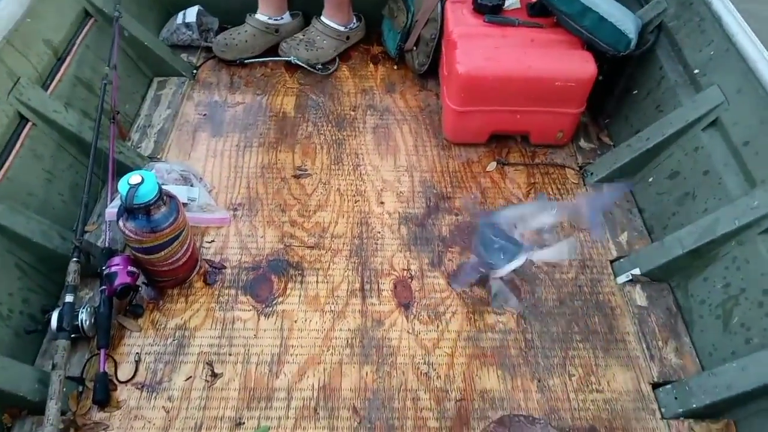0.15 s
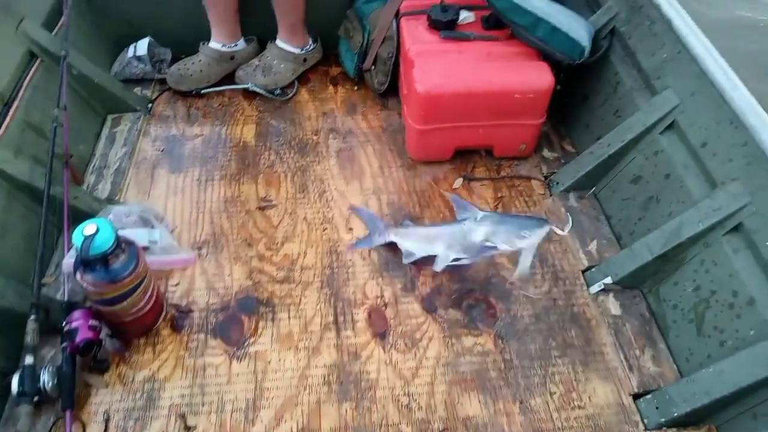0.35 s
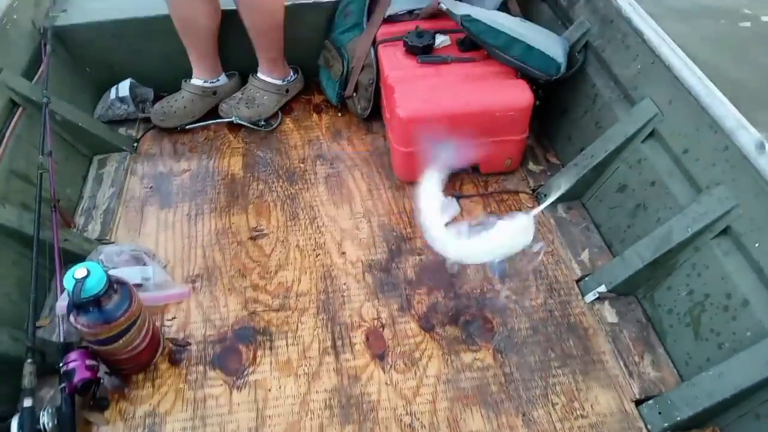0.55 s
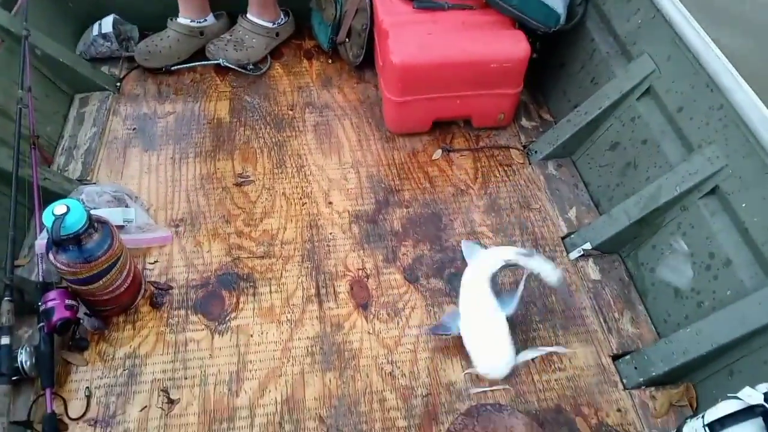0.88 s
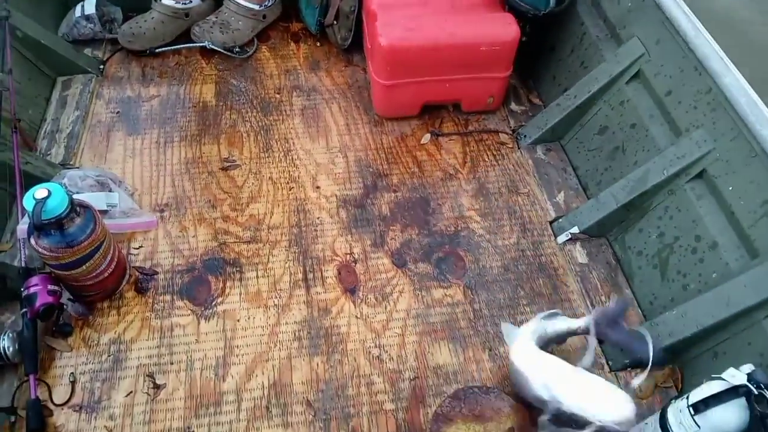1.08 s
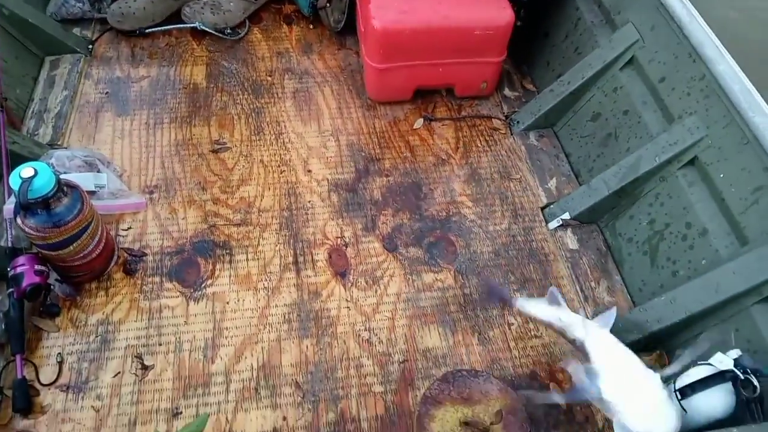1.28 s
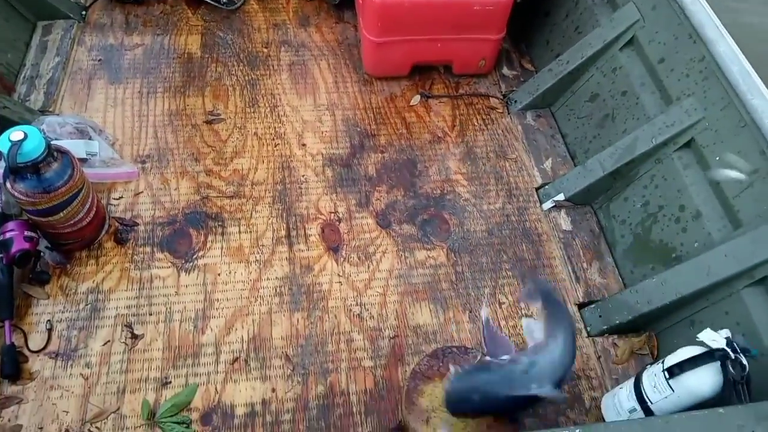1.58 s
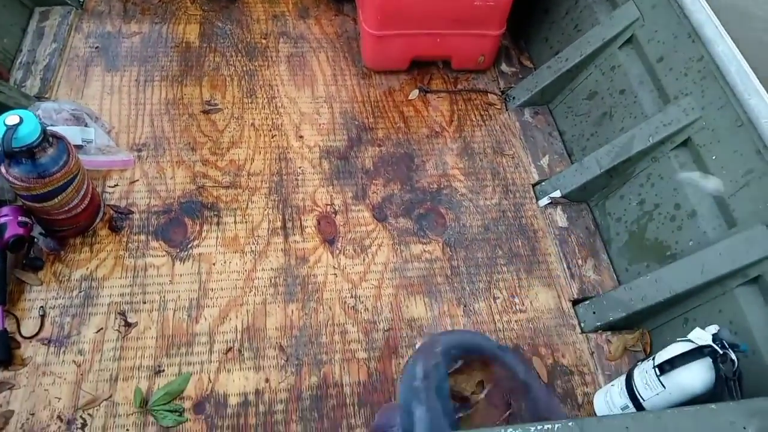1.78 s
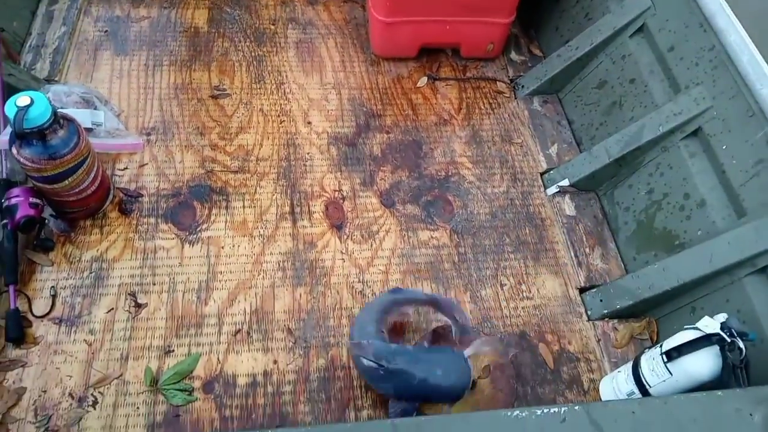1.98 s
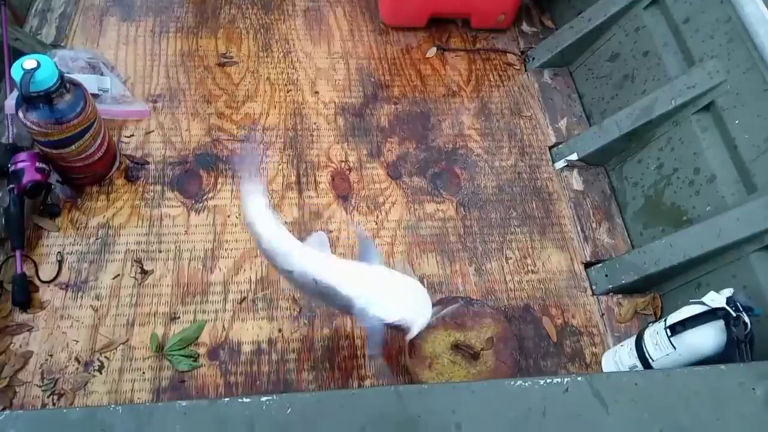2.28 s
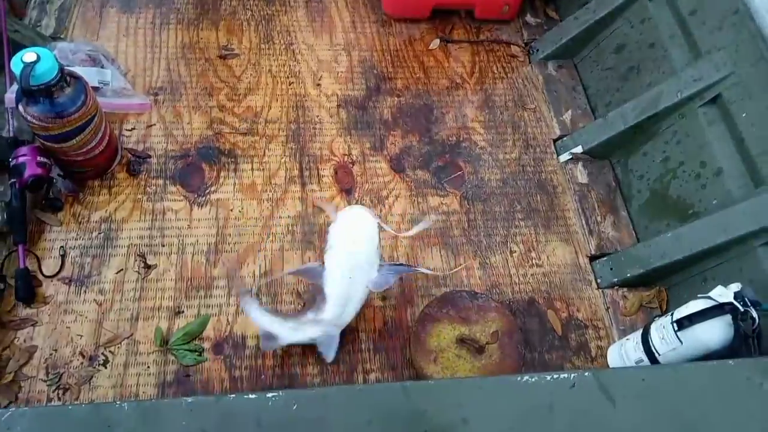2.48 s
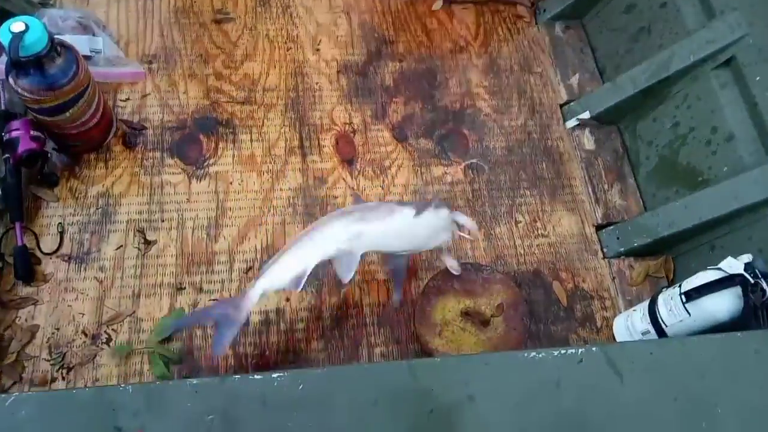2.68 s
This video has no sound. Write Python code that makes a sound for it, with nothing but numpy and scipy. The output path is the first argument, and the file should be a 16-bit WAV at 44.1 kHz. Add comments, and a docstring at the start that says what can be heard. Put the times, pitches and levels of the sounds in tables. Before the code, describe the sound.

A wet fish flops on a small metal boat's wooden floor, close and nearly mono. Faint slithers lead to the loudest slap and boom at 0.24 s. Blows resume around 0.7-0.9 s, then a busy flurry from 1.0 to 1.5 s with scraping, squeaks and a sharp click at 1.35. Wet slithers and clicks follow near 1.7, a thump at 2.0, a hard slap at 2.45, then weak pats over quiet open air.

```python
"""Wet fish in a metal boat

A wet fish thrashes on the plywood floor of a small metal boat, heard close up and nearly mono.
Its body thumps the boards and sets the hull ringing: fading sine tones plus shaped noise.
Its tail slaps and its skin slithers: bursts of noise and tiny crackles, unevenly coloured.
Fins scrape, click and squeak as gliding tones and short noises, over quiet open air."""
import sys
import numpy as np
from scipy import signal
from scipy.fft import rfft, irfft, next_fast_len
from scipy.io import wavfile
from scipy.ndimage import map_coordinates

SR = 44100
rng = np.random.default_rng(int(sys.argv[2]) if len(sys.argv) > 2 else 0)


def materialize(psi):
    """Save the field psi as 16-bit PCM at rate SR to the path in sys.argv[1].

    A 1-D psi becomes a single channel; in a 2-D psi each row is a channel.
    """
    bounded = np.clip(np.atleast_2d(psi).T, -1, 1)
    quanta = np.round(bounded * 32767).astype(np.int16)
    wavfile.write(sys.argv[1], SR, quanta)


N = 125685  # length of the scene in samples


def amp(db):
    """Turn decibels into a gain."""
    return 10 ** (np.asarray(db) / 20)


def decay(t, t60):
    """A natural fade that drops 60 dB in t60 seconds."""
    return amp(-60 * t / t60)


def rise(t, s):
    """A soft attack: most of the way up after s seconds."""
    return 1 - np.exp(-t / s)


def unit(x):
    """Scale to an average (rms) level of 1."""
    return x / np.sqrt(np.mean(x ** 2) + 1e-20)


def with_energy_of(envelope, x):
    """Scale x to the same average energy as the envelope."""
    return unit(x) * np.sqrt(np.mean(envelope ** 2))


def wobble(rate, size):
    """A smooth random curve with `rate` random points a second."""
    points = rng.standard_normal(int(size * rate / SR) + 4)
    return map_coordinates(points, [np.arange(size) * rate / SR])


def along(points, hz):
    """Gain at each frequency, read between (Hz, dB) points on a log axis."""
    f, db = np.transpose(points)
    return amp(np.interp(np.log(hz + 1), np.log(f + 1), db))


def filtered(x, response):
    """Colour x by a gain for each frequency."""
    m = next_fast_len(x.shape[-1] + 4096)
    spectrum = rfft(x, m) * response(np.fft.rfftfreq(m, 1 / SR))
    return irfft(spectrum, m)[..., :x.shape[-1]]


def resonance(f, hz, width_hz):
    """One resonance: strongest at hz, weaker on both sides."""
    return 1j * f * width_hz / (hz * hz - f * f + 1j * f * width_hz)


def burst(envelope, response):
    """Coloured noise that follows an envelope and has its energy."""
    noise = filtered(rng.standard_normal(len(envelope)), response)
    return with_energy_of(envelope, noise * envelope)


def add(track, s, x):
    """Mix x into the track from second s."""
    i = max(round(s * SR), 0)
    track[i:i + len(x)] += x[:max(len(track) - i, 0)]


PATCH_DB, PATCH_SPACING_HZ = 5.5, 149.6  # unevenness, and spacing of its random points


def patchy(f):
    """Uneven colour: a new random curve over frequency makes each noise burst patchy."""
    points = rng.standard_normal(400)
    curve = map_coordinates(points, [f / PATCH_SPACING_HZ], mode="mirror")
    return amp(PATCH_DB * np.clip(curve, -2, 2))


# Clear notes of the metal hull. Each row: pitch in Hz, relative level in dB.
HULL_NOTES = [(463, 14.5), (506, 11), (571, 12), (641, 6.5), (842, 7), (1026, 6), (1102, -4), (1416, 6.5),
              (1521, 5), (1689, 2), (1997, -3.5), (2050, -5.5)]
HULL_WIDTH_HZ = 8.6


def singing(f):
    """The hull's clear resonances alone: narrow peaks where the metal vibrates easily."""
    return sum(amp(db) * np.abs(resonance(f, hz, HULL_WIDTH_HZ)) ** 2 for hz, db in HULL_NOTES)


# Dense, blurred resonances of the hull. Each row: frequency in Hz, gain in dB.
HULL_BED = [(150, -54), (330, 10.5), (480, 4.5), (800, 3), (1300, -1.5), (2400, -9.5), (4500, -16.5),
            (6300, -25), (8000, -71), (16000, -52)]
HULL_PEAK_DB = -1  # clear notes against the bed


def hull(f):
    """The whole metal hull: clear notes over a bed of dense ones."""
    return along(HULL_BED, f) + amp(HULL_PEAK_DB) * singing(f)


# Tone of the open air. Each row: frequency in Hz, gain in dB.
AIR_SPECTRUM = [(15, -68), (25, -11), (82, 5), (185, -2.5), (217, -4.5), (363, -16), (575, -14.5),
                (754, -22), (2280, -24), (3520, -29.5), (5730, -21.5), (8140, -43.5), (16000, -41)]
AIR_DB = -55.5


def air():
    """Quiet open air: steady noise whose level drifts gently."""
    drift = amp(2.5 * wobble(7.8, size=N))
    return amp(AIR_DB) * burst(drift, lambda f: along(AIR_SPECTRUM, f))


# Short wide noise bursts at some of the blows. Each row: start in seconds, level in dB.
WIDE_BURSTS = [(0.234, -30), (0.706, -31), (1.152, -36), (1.353, -35.5)]
# Tone of the wide bursts. Each row: frequency in Hz, gain in dB.
WIDE_SPECTRUM = [(3800, -52), (5400, 11), (6500, -12), (8000, -10.5), (11300, -21), (13000, -25),
                 (16000, -32)]
WIDE_FADE_S = 0.011
BURST_RISE_S = 0.0008  # attack of wide bursts and slaps


def wide_bursts():
    """Short wide noise bursts, bright and opposite in sign left and right, at some of the blows."""
    out, t = np.zeros(N), np.arange(SR // 20) / SR
    for s, db in WIDE_BURSTS:
        envelope = rise(t, BURST_RISE_S) * np.exp(-t / WIDE_FADE_S)
        add(out, s, amp(db) * burst(envelope, lambda f: along(WIDE_SPECTRUM, f)))
    return out


# The boards flex as the fish winds up.
# Each row: time of the peak in seconds, pitch at the peak in Hz, level in dB, rise time in seconds.
FLEXES = [(0.234, 105, -34, .016), (0.63, 125, -43, .03), (0.692, 103, -23, .015), (0.747, 215, -30, .028),
          (1.095, 85, -33, .025)]
FLEX_RELEASE_S, FLEX_CLIMB_HZ_PER_S = 0.0052, 520


def flexes():
    """A low swell of the boards climbs in pitch under the load and ends as the fish lets go."""
    out = np.zeros(N)
    for s, hz, db, swell_s in FLEXES:
        t = np.arange(N) / SR - s  # negative before the peak
        phase = 2 * np.pi * (hz + FLEX_CLIMB_HZ_PER_S * t / 2) * t
        envelope = np.exp(np.minimum(t / swell_s, -t / FLEX_RELEASE_S))
        out += np.sqrt(2) * amp(db) * np.sin(phase) * envelope
    return out


# Path of the fin scrape. Each row: time in seconds, centre pitch in Hz, level in dB.
SCRAPE = [(1.225, 1239, -51), (1.243, 1149, -33), (1.261, 887, -36), (1.275, 626, -27), (1.293, 470, -32.5),
          (1.325, 440, -33)]
SCRAPE_WIDTH_HZ = 150


def fin_scrape():
    """A spine drags along the hull: a narrow band of noise slides down as a falling rasp."""
    t = np.arange(N) / SR
    s, hz, db = np.transpose(SCRAPE)
    phase = 2 * np.pi * np.cumsum(np.interp(t, s, hz)) / SR
    rasp = wobble(SCRAPE_WIDTH_HZ * 2, size=N) * np.sin(phase)
    rasp = rasp + wobble(SCRAPE_WIDTH_HZ * 2, size=N) * np.cos(phase)
    return rasp * amp(np.interp(t, s, db)) * (t > s[0]) * (t < s[-1])


# Rubbery squeaks of skin and fins.
# Each row: start in seconds, length in seconds, start pitch in Hz, end pitch in Hz, level in dB.
SQUEAKS = [(0.021, 0.018, 1020, 970, -41.5), (0.03, 0.041, 1100, 1120, -46),
           (0.104, 0.042, 3230, 3360, -50), (0.121, 0.051, 2120, 2200, -52.5),
           (1.014, 0.016, 4523, 4400, -41.5), (1.11, 0.0085, 1100, 750, -25.5),
           (1.279, 0.025, 4430, 4540, -27), (1.49, 0.098, 500, 502, -44), (1.66, 0.15, 520, 467, -53.5),
           (1.675, 0.077, 808, 864, -50), (1.812, 0.057, 345, 362, -41.5), (1.856, 0.089, 387, 406, -41),
           (1.869, 0.022, 503, 538, -36), (1.929, 0.079, 427.5, 444, -49)]
SQUEAK_ROUGH_RAD, SQUEAK_WAVER_HZ = 0.57, 219  # phase shake and how fast it changes


def squeaks():
    """Skin catches and slips fast enough to give a short, unsteady pitch."""
    out, t = np.zeros(N), np.arange(SR // 5) / SR
    for s, length, start_hz, end_hz, db in SQUEAKS:
        progress = np.minimum(t / length, 1)
        glide_hz = start_hz + (end_hz - start_hz) * progress
        shake = SQUEAK_ROUGH_RAD * wobble(SQUEAK_WAVER_HZ, size=len(t))
        tone = np.sin(2 * np.pi * np.cumsum(glide_hz) / SR + shake)
        level = amp(db + 2.3 * wobble(SQUEAK_WAVER_HZ, size=len(t)))
        add(out, s, np.sqrt(2) * level * np.sin(np.pi * progress) * tone)
    return out


# Hard fin spines click on the floor and the hull.
# Each row: start in seconds, level in dB, ring pitch in Hz.
TICKS = [(0.171, -45.5, 4940), (1.252, -20.5, 4700), (1.3536, -13.5, 4260), (1.657, -29, 5100),
         (1.686, -23, 4050)]
# Bright tone of clicks and, further down, splashes. Each row: frequency in Hz, gain in dB.
SPLASH_SPECTRUM = [(500, -63), (1500, -34), (2800, -4.5), (4200, 2.5), (6100, -3.5), (7000, -6.5),
                   (8200, -15), (10300, -14.5), (13000, -26), (15500, -19.5)]
TICK_T60_S, TICK_WIDTH_HZ, TICK_RING_DB = 0.014, 1600, 25.5
TICK_TAIL_DB, BRIGHT_TAIL_T60_S = -19.5, 0.14  # the slaps share this tail time


def ticks():
    """A spine's hard tip gives a very short ringing click and a faint echo that fades smoothly."""
    out, t = np.zeros(N), np.arange(SR // 8) / SR
    for s, db, hz in TICKS:
        def colour(f):
            ring = amp(TICK_RING_DB) * resonance(f, hz, TICK_WIDTH_HZ)
            return along(SPLASH_SPECTRUM, f) * (1 + ring)

        click = burst(decay(t, TICK_T60_S), colour)
        echo = burst(amp(TICK_TAIL_DB) * decay(t, BRIGHT_TAIL_T60_S), colour)
        add(out, s, amp(db) * (click + echo))
    return out


CRACKLES_PER_S, CRACKLE_T60_S, CRACKLE_SPREAD_DB = 6000, 0.014, 10
CRACKLE_LOW_HZ, CRACKLE_HIGH_HZ = 700, 15500


def crackle(envelope, response):
    """Tiny bubbles of slime burst: each one is a short ping at a random time, pitch and strength."""
    size, t = len(envelope), np.arange(SR // 50) / SR
    draws = rng.random((int(CRACKLES_PER_S * size / SR), 3))
    when, pitch, weakness = draws.T[:, :, None]
    hz = CRACKLE_LOW_HZ * (CRACKLE_HIGH_HZ / CRACKLE_LOW_HZ) ** pitch
    strength = np.sqrt(hz) * amp(-CRACKLE_SPREAD_DB * weakness)
    pings = strength * decay(t, CRACKLE_T60_S) * np.sin(2 * np.pi * hz * t)
    at = ((when * size).astype(int) + np.arange(len(t))) % size
    summed = np.bincount(at.ravel(), pings.ravel(), size)
    return with_energy_of(envelope, filtered(summed, response) * envelope)


# Wet skin sliding on the boards.
# Each row: start in seconds, length in seconds, hiss level in dB, rub level in dB.
SLIDES = [(0.0, 0.058, -38.5, -57), (0.541, 0.026, -57.5, -80), (0.602, 0.024, -52, -68),
          (0.645, 0.023, -51, -81), (0.695, 0.064, -40, -36.5), (0.79, 0.2, -56.5, -46),
          (0.996, 0.21, -44.5, -42.5), (1.224, 0.1, -38, -31), (1.244, 0.032, -32, -30),
          (1.332, 0.17, -44, -34), (1.47, 0.1, -62, -39.5), (1.575, 0.094, -63.5, -53),
          (1.645, 0.085, -37, -47), (1.742, 0.089, -59.5, -47.5), (1.818, 0.094, -65, -52.5),
          (1.864, 0.065, -46.5, -46), (1.939, 0.22, -49.5, -50.5), (2.03, .11, -47.5, -39.5),
          (2.56, 0.14, -50.5, -45.5), (2.742, 0.34, -48.5, -74)]
# Tone of the wet hiss. Each row: frequency in Hz, gain in dB.
HISS_SPECTRUM = [(400, 1), (1200, -7), (2600, -2.5), (4600, 10), (6000, 6.5), (7000, -13), (8200, -22),
                 (10300, -18.5), (13000, -38), (15500, -19)]
# Tone of the hollow rub. Each row: frequency in Hz, gain in dB.
RUB_SPECTRUM = [(60, 4), (160, 1.5), (290, -12.5), (420, 9), (560, 4), (750, 0), (1200, -7.5), (2200, -11),
                (5000, -69)]
SLIDE_RISE_S, SLIDE_FULL = 0.01, 0.73  # attack, and the share of the length before it fades
STICK_DB = 2.5  # how unevenly the skin sticks and lets go
FILM_DB = -4  # smooth hiss of the water film, against the crackles
SLIDE_RING_DB = -8.5  # the hull sings along under a rub


def slides():
    """Slimy skin sticks and lets go: dense wet crackles and hiss over a rub that rings the hull."""
    out, t = np.zeros(N), np.arange(SR // 4) / SR
    for s, length, hiss_db, rub_db in SLIDES:
        stroke = rise(t, SLIDE_RISE_S) / np.sqrt(1 + (t / (SLIDE_FULL * length)) ** 14)
        stroke = stroke * unit(amp(STICK_DB * np.tanh(wobble(120.0, size=len(t)))))
        wet = lambda f: along(HISS_SPECTRUM, f) * patchy(f)
        hiss = crackle(stroke, wet) + amp(FILM_DB) * burst(stroke, wet)
        hiss = hiss / np.hypot(1, amp(FILM_DB))
        rub = burst(stroke, lambda f: along(RUB_SPECTRUM, f) * patchy(f))
        rub = rub + amp(SLIDE_RING_DB) * burst(stroke, singing)
        add(out, s, amp(hiss_db) * hiss + amp(rub_db) * rub)
    return out


# Wet tail and fin slaps.
# Each row: start in seconds, splash level in dB, smack level in dB, length in seconds, ring pitch in Hz.
SLAPS = [(0.029, -38, -43, 0.012, 5360), (0.108, -43, -53.5, 0.029, 3730), (0.189, -46, -60, 0.016, 5370),
         (0.239, -17.5, -17.5, 0.0097, 5820), (0.249, -30.5, -28.5, 0.028, 3770),
         (0.371, -45, -67, 0.013, 5060), (0.446, -50, -45.5, 0.015, 5100), (0.705, -26, -30, 0.0075, 4630),
         (0.723, -33.5, -34, 0.0094, 5030), (0.744, -34, -29, 0.0045, 4300),
         (0.753, -26, -28, 0.0082, 5260), (0.898, -40.5, -48.5, 0.022, 4830),
         (1.006, -43, -60, 0.0064, 4700), (1.068, -22, -28, 0.0017, 6050), (1.083, -32, -36, 0.015, 3670),
         (1.093, -34, -41, 0.019, 5900), (1.112, -44, -26, 0.0031, 4300), (1.133, -34, -48, 0.013, 4360),
         (1.155, -25, -37, 0.0082, 4830), (1.217, -35, -34, 0.012, 5750), (1.330, -30.5, -28, 0.011, 4500),
         (1.339, -30, -36, 0.012, 4700), (1.387, -25, -29.5, 0.016, 5530), (1.427, -29, -31.5, 0.013, 5020),
         (1.514, -39.5, -42.5, 0.015, 4730), (1.682, -29.5, -41, 0.0095, 4600),
         (1.707, -39.5, -45.5, 0.014, 5340), (1.822, -43, -46, 0.013, 2690), (1.862, -24, -40, 0.009, 4220),
         (1.901, -40, -46.5, 0.0074, 4700), (1.989, -26.5, -39, 0.014, 4480),
         (2.431, -44.5, -42.5, 0.0094, 4680), (2.451, -18, -24, 0.0079, 5860),
         (2.489, -28, -30, 0.021, 5130), (2.537, -42, -36.5, 0.023, 4450), (2.571, -59, -41, 0.027, 4500),
         (2.613, -45, -43, 0.014, 4700), (2.64, -41.5, -36, 0.01, 4500), (2.731, -29, -64, 0.0095, 5220),
         (2.758, -40.5, -61, 0.0093, 4500), (2.803, -44, -70, 0.0094, 5800),
         (2.828, -39.5, -63, 0.016, 4030)]
# Tone of the dull smack. Each row: frequency in Hz, gain in dB.
SMACK_SPECTRUM = [(100, -19), (350, 14.5), (800, 1.5), (1800, 5), (3000, 2.5), (5000, -26), (8000, -19.5),
                  (16000, -86)]
SLAP_LEAD_S, SLAP_LEAD_DB = 0.0025, -11  # the wet skin touches just before the full blow
SLAP_GRAIN_DB, SLAP_TYPICAL_S = 4, 0.012
SLAP_RING_DB, SLAP_RING_WIDTH_HZ = 8, 590
SPLASH_TAIL_DB, ECHO_TOP_HZ = -11, 7000  # the splash echo is duller above this
SMACK_TAIL_DB, SMACK_TAIL_T60_S = -4, 0.17
SLAP_HULL_DB, SLAP_HULL_T60_S = -10.5, 0.28  # a smack leaves the hull singing


def slaps():
    """A water film bursts under the tail: grainy splash, duller smack and darker echoes in the hull."""
    out, lead = np.zeros(N), 0.02  # seconds kept free before the blow
    since = np.arange(SR // 4) / SR - lead
    t = np.maximum(since, 0)
    attack = rise(t, BURST_RISE_S)
    touch = amp(SLAP_LEAD_DB) * np.exp(-np.abs(since) / SLAP_LEAD_S)
    for s, splash_db, smack_db, length, hz in SLAPS:
        grain = unit(amp(SLAP_GRAIN_DB * wobble(1518.0, size=len(t))))
        contact = (attack + touch) * np.exp(-(t / length) ** 2) * grain
        echo = attack * np.sqrt(length / SLAP_TYPICAL_S)  # a longer contact feeds the hull more

        def colour(f):
            ring = amp(SLAP_RING_DB) * resonance(f, hz, SLAP_RING_WIDTH_HZ)
            return along(SPLASH_SPECTRUM, f) * patchy(f) * (1 + ring)

        splash_tail = echo * amp(SPLASH_TAIL_DB) * decay(t, BRIGHT_TAIL_T60_S)
        splash = burst(contact, colour)
        splash = splash + burst(splash_tail, lambda f: colour(f) / (1 + (f / ECHO_TOP_HZ) ** 2))

        smack_tail = echo * amp(SMACK_TAIL_DB) * decay(t, SMACK_TAIL_T60_S)
        smack = burst(np.hypot(contact, smack_tail), lambda f: along(SMACK_SPECTRUM, f) * patchy(f))
        smack = smack + burst(echo * amp(SLAP_HULL_DB) * decay(t, SLAP_HULL_T60_S), singing)
        add(out, s - lead, amp(splash_db) * splash + amp(smack_db) * smack)
    return out


# Body blows on the floor. Each row: start in seconds, boom pitch in Hz, boom level in dB,
# boom 60 dB fade time in seconds, knock pitch in Hz, knock level in dB, punch in dB over the knock,
# board rumble level in dB, hull ring level in dB, ring length in seconds.
THUMPS = [(0.001, 101, -43, 0.15, 242, -33.5, 1, -47, -41.5, 0.082),
          (0.03, 97, -54, 0.18, 213, -38, -5, -49, -55, 0.049),
          (0.238, 111, -12, 0.2, 178.5, -8.5, 0.5, -20.5, -21.5, 0.23),
          (0.361, 87.3, -35, 0.35, 290, -36, 0, -25.5, -36.5, 0.09),
          (0.774, 102.2, -28, 0.5, 304, -15.5, -5, -22.5, -35.5, 0.13),
          (0.847, 70.2, -23, 0.4, 149, -24, 5, -38, -66, 0.07),
          (1.009, 89.8, -22, 0.34, 151, -25, 2.5, -57, -66, 0.19),
          (1.112, 93.2, -20.5, 0.93, 170, -18, 1.5, -27, -28, 0.31),
          (1.176, 90.4, -37, 0.47, 207, -20, -16, -32.5, -46, 0.2),
          (1.312, 85, -56, 0.22, 171, -22.5, -8, -39, -31, 0.14),
          (1.355, 90, -41, 0.36, 165, -17.5, -9, -29, -48, 0.11),
          (1.428, 78, -22, 0.19, 165, -23.5, -1, -32, -34.5, 0.095),
          (1.987, 107, -25, 0.37, 206.4, -17.5, 7.5, -27, -33, 0.15),
          (2.455, 87, -39, 0.42, 139, -27.5, 13.5, -33, -28.5, 0.08),
          (2.489, 112.5, -26, 0.17, 170, -31, -5, -52, -27, 0.11),
          (2.535, 70.4, -35, 0.95, 160, -22, 5.5, -33.5, -59, 0.063),
          (2.787, 89, -57, 0.15, 240, -35.5, -17, -44, -74, 0.048)]
# Notes of the floor boards. Each row: pitch in Hz, relative level in dB, 60 dB fade time in seconds.
BOARDS = [(145.3, -9, 0.13), (166.2, 1.5, 0.18), (236, 3.5, 0.035), (277.5, -2.5, 0.16), (328, -4, 0.19),
          (367, 0.5, 0.063)]
# Tone of the board rumble. Each row: frequency in Hz, gain in dB.
RUMBLE_SPECTRUM = [(25, -12), (50, -16), (80, -1), (120, -0.5), (170, -2.5), (240, -2), (320, -5),
                   (430, -25), (800, -17.5), (2000, -84)]
BOOM_RISE_S, KNOCK_RISE_S, RING_RISE_S = 0.0078, 0.0034, 0.00092
PUNCH_T60_S, KNOCK_WIDTH_OCT = 0.052, 0.89  # where the fish lands decides which boards' notes answer
RUMBLE_T60_S, RING_T60_S = 1, 0.4  # before the extra loss
# extra loss: the ring falls away steeply around the ring length, the boom around this time
EXTRA_LOSS_DB, BOOM_LOSS_S = 10, 0.15
RATTLE_DB, RATTLE_PER_S = 2, 130  # the loose boards chatter as they ring


def thumps():
    """Each blow booms the floor, knocks the boards' notes and leaves boards and hull ringing."""
    out, t = np.zeros(N), np.arange(SR // 2) / SR
    for (s, boom_hz, boom_db, boom_t60, knock_hz, knock_db, punch_db,
         rumble_db, ring_db, ring_s) in THUMPS:
        boom_loss = amp(-EXTRA_LOSS_DB * (t / BOOM_LOSS_S) ** 4)
        boom = np.sin(2 * np.pi * boom_hz * t) * decay(t, boom_t60) * boom_loss * rise(t, BOOM_RISE_S)

        knock = amp(punch_db) * decay(t, PUNCH_T60_S) * np.sin(2 * np.pi * knock_hz * t)
        for hz, db, t60 in BOARDS:
            # notes near the knock pitch answer most, each slightly off its pitch
            reach = 1 / (1 + (np.log2(hz / knock_hz) / KNOCK_WIDTH_OCT) ** 2)
            note = np.sin(2 * np.pi * hz * t * (1 + rng.normal(0, 0.041)))
            knock = knock + reach * note * amp(db) * decay(t, t60)
        knock = knock * rise(t, KNOCK_RISE_S)

        held = rise(t, RING_RISE_S) * amp(-EXTRA_LOSS_DB * np.minimum(t / ring_s, 2) ** 4)
        rumble = burst(held * decay(t, RUMBLE_T60_S), lambda f: along(RUMBLE_SPECTRUM, f))
        chatter = unit(amp(RATTLE_DB * wobble(RATTLE_PER_S, size=len(t))))
        ring = burst(held * chatter * decay(t, RING_T60_S), hull)

        blow = np.sqrt(2) * amp(boom_db) * boom + amp(knock_db) * knock
        add(out, s, blow + amp(rumble_db) * rumble + amp(ring_db) * ring)
    return out


def scene():
    """The fish over quiet open air, all in the middle except the wide bursts."""
    middle = air() + flexes() + fin_scrape() + squeaks() + ticks() + slides() + slaps() + thumps()
    side = wide_bursts()
    return np.array([middle + side, middle - side])


LOW_CUT_HZ, TOP_HZ = 52.4, 16000


def record(dry):
    """The recorder thins the deep bass and keeps nothing above its band limit."""
    low_cut = signal.butter(2, LOW_CUT_HZ, "high", fs=SR, output="sos")
    thin = signal.sosfilt(low_cut, dry)
    return filtered(thin, lambda f: f < TOP_HZ)


dry = scene()
out = record(dry)
materialize(out)
```